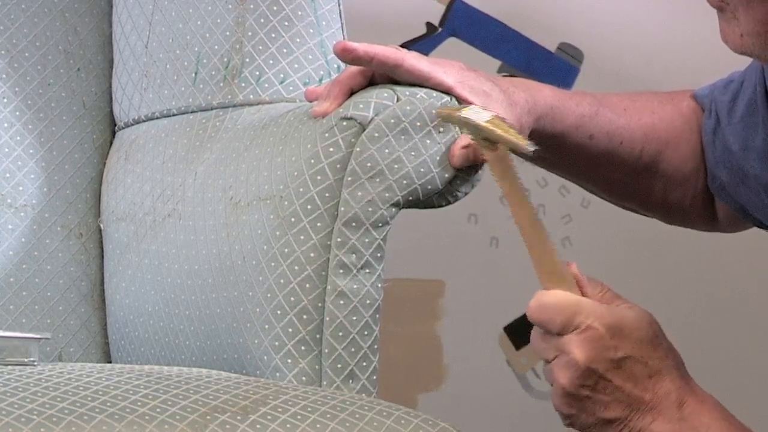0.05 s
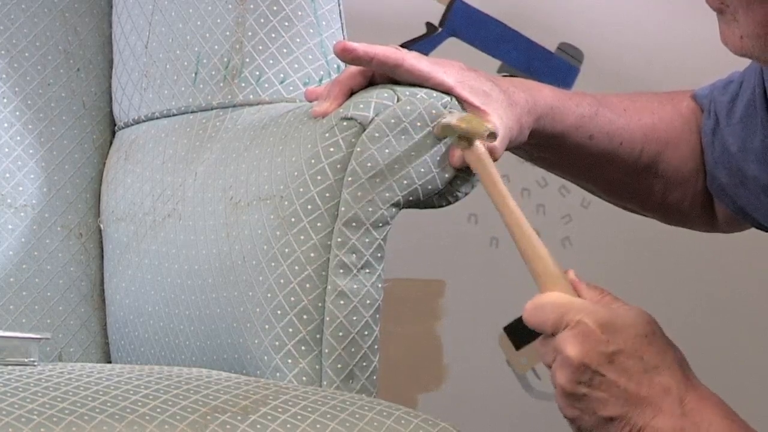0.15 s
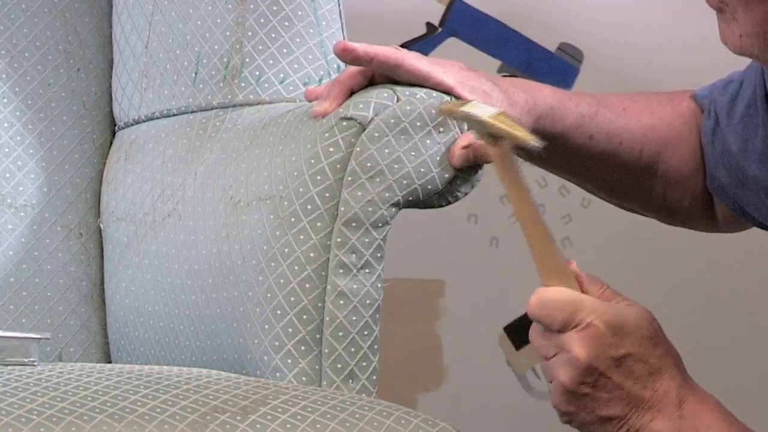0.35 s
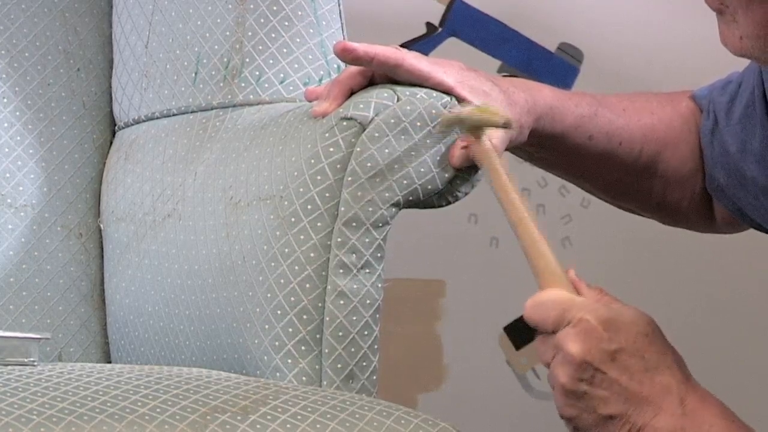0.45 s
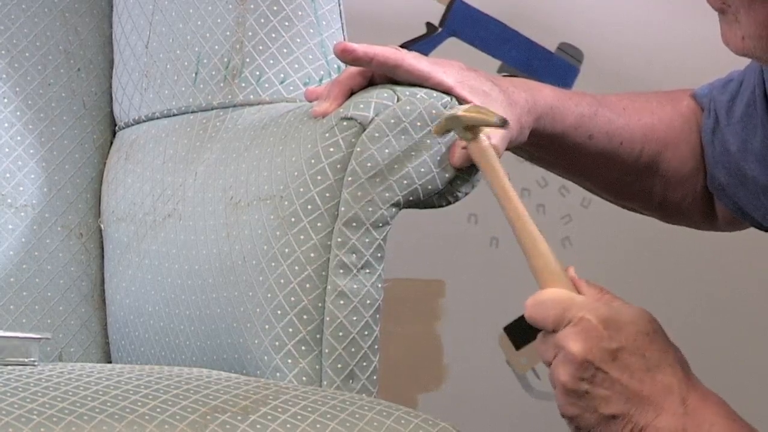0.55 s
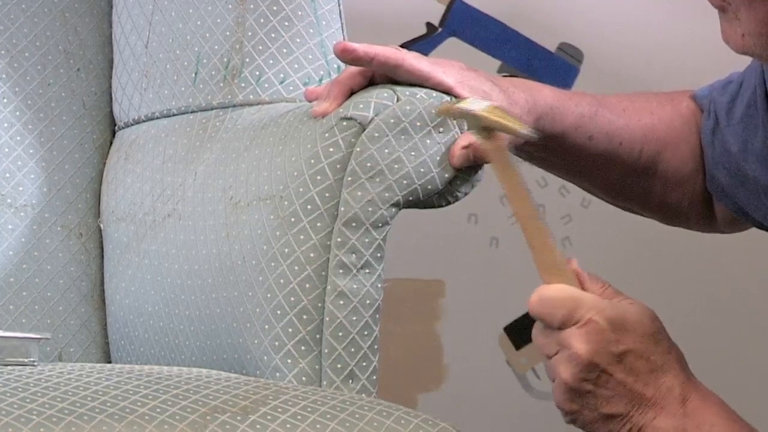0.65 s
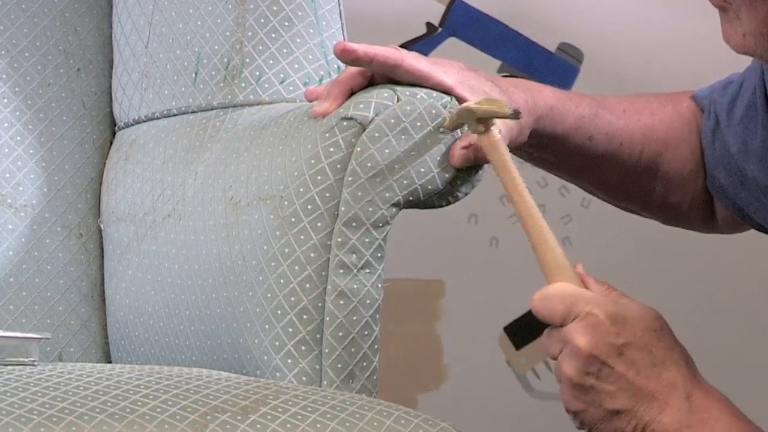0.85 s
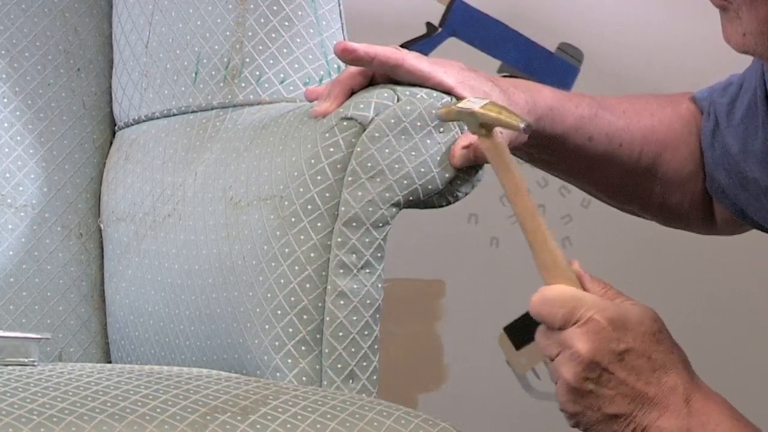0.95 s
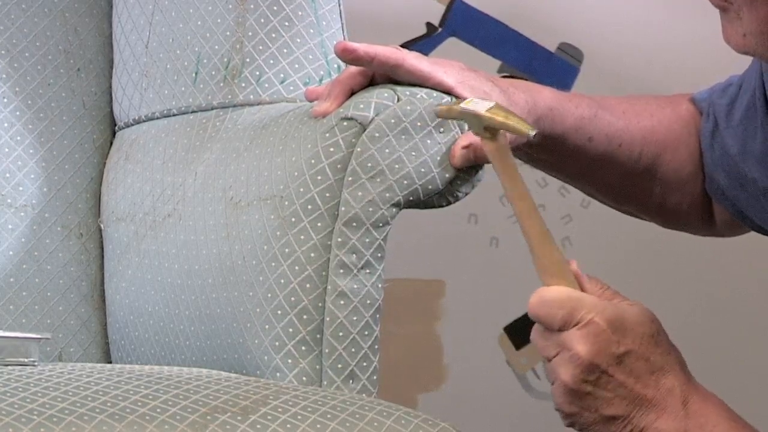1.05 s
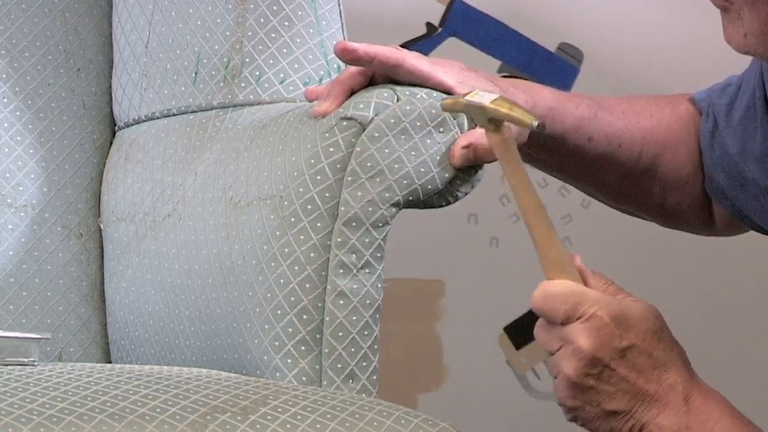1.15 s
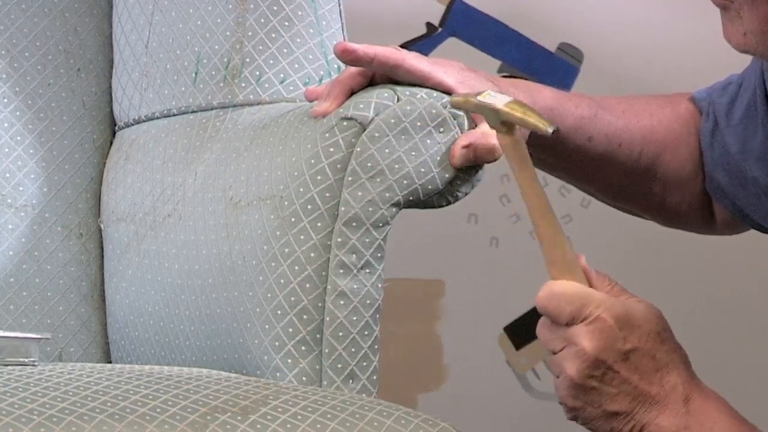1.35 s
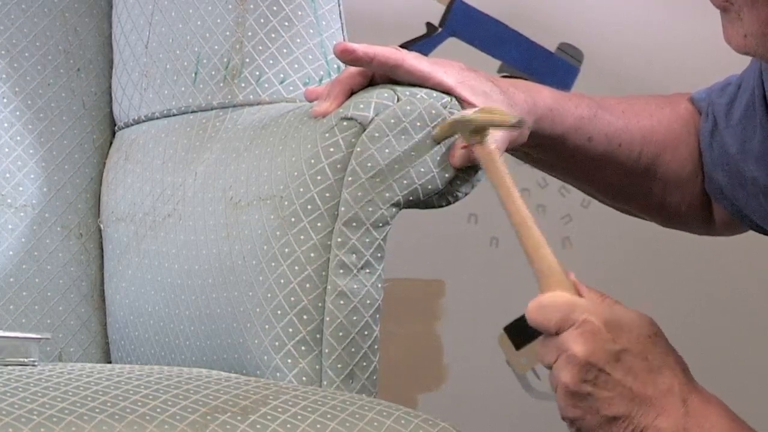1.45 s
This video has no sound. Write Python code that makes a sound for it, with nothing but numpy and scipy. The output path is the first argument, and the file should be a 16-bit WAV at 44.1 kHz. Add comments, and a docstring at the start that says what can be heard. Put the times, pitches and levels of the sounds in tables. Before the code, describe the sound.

Hammering, close up: three evenly spaced woody thuds with a hard crack and brief steel ring

```python
"""Brads hammered into a chair arm

Three quick blows, close to the microphone, drive brads into the padded wooden arm of a chair.
The frame knocks (decaying modes and noise), the steel head rings (wavering modes), the input overloads.
Each blow returns faintly half a second later, as do two struck just before the start.
Near the end a fingertip brushes the fabric (dense grains), over room hum and hiss (sines, banded noise)."""
import sys
import numpy as np
from scipy import signal
from scipy.fft import rfft, irfft, next_fast_len
from scipy.io import wavfile

SR = 44100
rng = np.random.default_rng(int(sys.argv[2]) if len(sys.argv) > 2 else 0)


def bounce(signal):
    """Save signal as a 16-bit WAV file at the path given by the first command-line argument."""
    frames = np.transpose(np.atleast_2d(signal))
    limited = np.clip(frames, -1, 1)
    pcm = np.round(limited * 32767).astype(np.int16)
    wavfile.write(sys.argv[1], SR, pcm)


N = 66150   # samples, 1.5 s
LEAD_S = 0.5   # time computed before the start, so that earlier blows can still ring and return

# The hammer blows; the first two fall before the start.
# Each row: start in seconds, strength in dB, then the trim in dB of the head's low ring,
# of its high ring, and of the crack.
HAMMER_BLOWS = [(-.415, -2.5, -9, 3, 6), (-.107, -2, -3, 9, 0), (0.2078, -1.5, -4.5, 3, 0),
                (0.5257, -1.5, -6, 1, -1), (0.8473, -1.5, 4, 1, 0)]


def blows():
    """Wood and steel of every blow; the body's noise is mostly shared, so it answers nearly alike."""
    own_share = 0.24   # part of the noise power that is new in each blow
    lead = int(LEAD_S * SR)
    t = np.arange(SR // 2) / SR
    out = np.zeros((2, lead + N + SR))
    shared = rng.standard_normal((2, SR))
    for start, strength_db, low_db, high_db, crack_db in HAMMER_BLOWS:
        own = rng.standard_normal((2, SR))
        white = np.sqrt(1 - own_share) * shared + np.sqrt(own_share) * own
        wood = crack(white, t, crack_db) + push(t) + frame(t) + knock(white, t)
        steel = head(t, low_db, high_db)
        i = lead + int(start * SR)
        out[:, i:i + len(t)] += from_db(strength_db) * np.array([wood, steel])
    return out[:, :lead + N]


# The dense body of the knock, noise dying band by band.
# Each row: frequency in Hz, relative level in dB per Hz, time to fall 60 dB in seconds.
KNOCK_BODY = [(40, -21, 0.69), (100, -13.5, 0.4), (250, -4, 0.31), (600, -7.5, .22), (1100, -8, 0.11),
              (2000, -14, 0.13), (4000, -35.5, 0.19), (7740, -49.5, 0.3), (15000, -54.5, .07)]
KNOCK_DB, KNOCK_RISE_CYCLES = 17, 3.1


def knock(white, t):
    """Many close modes heard as noise; each band rises over a few cycles, so the lows come later."""
    out = 0
    for k, (low, high) in enumerate(half_octaves()):
        hz = np.sqrt(low * high)
        rise = 1 - np.exp(-t * hz / KNOCK_RISE_CYCLES)
        decay = from_db(at_hz(KNOCK_BODY, hz) - 60 * t / at_hz(KNOCK_BODY, hz, column=2))
        noise = band(white[k % 2], low, high)[-len(t):]
        out = out + rise * decay * noise
    return out * from_db(KNOCK_DB)


# The separate modes of the wooden chair frame.
# Each row: frequency in Hz, level in dB before the blow's strength, time to fall 60 dB in seconds.
FRAME_MODES = [(75.6, -9.5, 0.18), (111.2, -9, 0.19), (154, -12.5, .22), (240.5, -6.5, 0.17),
               (309.4, 4, 0.076), (339, -15.5, 0.29), (465.2, 1.5, 0.081), (549, 1.5, 0.084),
               (619, 0.5, 0.12), (724.6, -6.5, 0.08), (808.3, -3, 0.076), (1000, -6, 0.095),
               (1162, -17, 0.15), (1383, -13.5, 0.1), (1630, -6, 0.096), (2305, -12.5, 0.071)]
MODE_SPREAD_DB, FRAME_RISE_CYCLES = 0.5, 1.05   # mode levels vary from blow to blow


def frame(t):
    """Wooden modes of alternating sign; each swells over a cycle or so."""
    hz, db, t60 = np.transpose(FRAME_MODES)[:, :, None]
    db = db + MODE_SPREAD_DB * rng.standard_normal(hz.shape)
    sign = (-1.) ** np.arange(len(hz))[:, None]
    rise = 1 - np.exp(-t * hz / FRAME_RISE_CYCLES)
    modes = from_db(db - 60 * t / t60) * np.sin(2 * np.pi * hz * t)
    return np.sum(sign * rise * modes, axis=0)


# The modes of the steel hammer head.
# Each row: frequency in Hz, level in dB before the trims and strength of the blow,
# time to fall 60 dB in seconds.
HEAD_MODES = [(3237, -15, .15), (3388, -13, 0.051), (4540, -40.5, .12), (6160, -26.5, 0.2),
              (5870, -14, 0.047), (10570, -28.5, 0.11), (13120, -35, 0.12)]
HEAD_SPLIT_HZ = 8000   # low ring below, high ring above
CLANK_DB, CLANK_S = 7.5, 0.012   # the head rings louder while it presses on the brad
# the ring starts firm, then wavers in the moving hand
WAVER_DEPTH, WAVER_HZ, HEAD_STEADY_S = 0.98, 110, 0.012


def head(t, low_db, high_db):
    """Steel modes, each wavering in strength and phase."""
    hz, db, t60 = np.transpose(HEAD_MODES)[:, :, None]
    trim_db = np.where(hz < HEAD_SPLIT_HZ, low_db, high_db)
    level_db = db + trim_db + CLANK_DB * np.exp(-t / CLANK_S)
    noise = rng.standard_normal((2, len(hz), 2 * len(t)))
    slow = signal.lfilter(*signal.butter(2, WAVER_HZ, fs=SR), noise)[..., len(t):]
    onset = 1 - np.exp(-t / HEAD_STEADY_S)
    along, across = WAVER_DEPTH * onset * rms_one(slow)
    angle = 2 * np.pi * hz * t
    ring = (1 + along) * np.sin(angle) + across * np.cos(angle)
    return np.sum(from_db(level_db - 60 * t / t60) * ring, axis=0)


CRACK_DB, CRACK_T60_S, CRACK_RISE_S = 6, 0.019, 0.0009
CRACK_LOW_HZ, CRACK_HIGH_HZ = 1300, 5560
TICK_DB, TICK_T60_S, TICK_LOW_HZ = -14.5, 0.008, 5000   # steel meets steel
# The head skips on the brad, repeating the crack.
# Each row: delay in seconds, level in dB relative to the first crack.
BRAD_SKIPS = [(.004, -11), (0.012, -4.5), (.018, -17), (0.026, -22.5)]


def crack(white, t, crack_db):
    """A short noise burst and a bright tick at contact, repeated as the head skips on the brad."""
    rise = 1 - np.exp(-t / CRACK_RISE_S)
    burst = white[0, :len(t)] * rise * from_db(CRACK_DB + crack_db - 60 * t / CRACK_T60_S)
    tick = white[1, :len(t)] * from_db(TICK_DB + crack_db - 60 * t / TICK_T60_S)
    first = band(burst, CRACK_LOW_HZ, CRACK_HIGH_HZ) + band(tick, TICK_LOW_HZ, SR / 2)
    return first + sum(from_db(db) * delayed(first, after) for after, db in BRAD_SKIPS)


def push(t):
    """The padding is shoved in: one slow negative pulse."""
    peak_db, peak_s = -14, 0.0081
    return -from_db(peak_db) * t / peak_s * np.exp(1 - t / peak_s)


LATE_S, LATE_SMEAR_S = 0.509, 0.025
LATE_DB, LATE_WOOD_DB = -37, -4.5   # whole return; its wood against its steel
LATE_LOW_HZ, LATE_HIGH_HZ = 1300, 4060


def workshop(wood, steel):
    """Each blow direct, plus one thin, dull return, smeared by a short noise tail, much later."""
    t = np.arange(SR // 10) / SR
    smear = rng.standard_normal(len(t)) * np.exp(-(t / LATE_SMEAR_S) ** 2)
    smear = smear / np.sqrt(np.sum(smear ** 2))
    thin = band(delayed(steel + from_db(LATE_WOOD_DB) * wood, LATE_S), LATE_LOW_HZ, SR / 2)
    dull = signal.lfilter(*signal.butter(2, LATE_HIGH_HZ, fs=SR), thin)
    late = signal.fftconvolve(dull, smear)[:len(wood)]
    return (wood + steel + from_db(LATE_DB) * late)[-N:]   # the lead is dropped


# The fingertip on the fabric.
# Each row: start, peak and end in seconds, level at the peak in dB rms.
FABRIC_BRUSH = [(1.38, 1.41, 1.432, -39)]
GRAINS_PER_S, GRAIN_SPREAD_DB = 2700, 3.0
BRUSH_LOW_HZ, BRUSH_HIGH_HZ = 990, 2250


def brush():
    """Threads slip one by one under the fingertip: dense uneven grains swell and fade."""
    t = np.arange(N) / SR
    size = from_db(GRAIN_SPREAD_DB * rng.exponential(1, N))
    grains = (rng.random(N) < GRAINS_PER_S / SR) * size * rng.choice([-1, 1], N)
    colour = signal.butter(1, [BRUSH_LOW_HZ, BRUSH_HIGH_HZ], "band", fs=SR)
    soften = signal.butter(2, 3 * BRUSH_HIGH_HZ, fs=SR)
    rustle = rms_one(signal.lfilter(*soften, signal.lfilter(*colour, grains)))
    stroke = 0
    for start, peak, end, db in FABRIC_BRUSH:
        stroke = stroke + from_db(db) * np.interp(t, [start, peak, end], [0, 1, 0])
    return stroke * rustle


# The colour of the room noise. Each row: frequency in Hz, relative level in dB per Hz.
ROOM_COLOUR = [(25, -12.5), (60, -5), (110, -9.5), (190, 1.5), (250, -1), (330, -10.5), (470, -8),
               (640, -13.5), (800, -22.5), (1500, -25), (3000, -31), (6000, -30), (9000, -41),
               (16000, -36.5)]
# How alike left and right hear the room. Each row: frequency in Hz, correlation from 0 to 1.
ROOM_LIKENESS = [(60, 1.0), (240, 1.0), (950, 1.0), (3770, 1), (15000, 0.15)]
# The hum. Each row: frequency in Hz, level in dB rms.
ROOM_HUM = [(120, -47.5), (247, -65.5)]
ROOM_DB = -42.5   # rms of the noise without hum
ROOM_PATCHY_DB, ROOM_FLICKER_HZ = 2.5, 8


def room_tone():
    """Stereo noise in flickering bands, with steady hum."""
    noise, white = 0, rng.standard_normal((2, 2, N + SR // 4))
    for k, (low, high) in enumerate(half_octaves()):
        mid, side = band(white[k % 2], low, high)[:, -N:]
        hz = np.sqrt(low * high)
        alike = np.clip(at_hz(ROOM_LIKENESS, hz), 0, 1)
        gain = from_db(at_hz(ROOM_COLOUR, hz) + ROOM_PATCHY_DB * drift(ROOM_FLICKER_HZ))
        stereo = np.sqrt(1 + alike) * mid + np.sqrt(1 - alike) * side * [[1], [-1]]
        noise = noise + gain * stereo
    t = np.arange(N) / SR
    hum = sum(np.sqrt(2) * from_db(db) * np.sin(2 * np.pi * hz * t) for hz, db in ROOM_HUM)
    return from_db(ROOM_DB) * rms_one(noise) + hum


def from_db(db):
    """Gain of a level."""
    return 10 ** (np.asarray(db) / 20)


def rms_one(x):
    """Scaled to rms 1."""
    return x / np.sqrt(np.mean(x ** 2) + 1e-20)


def at_hz(points, hz, column=1):
    """A table read on a log frequency axis."""
    points = np.array(points)
    return np.interp(np.log(hz), np.log(points[:, 0]), points[:, column])


def band(x, low_hz, high_hz):
    """Second-order band-pass."""
    edges = [low_hz, min(high_hz, .45 * SR)]
    return signal.sosfilt(signal.butter(2, edges, "band", fs=SR, output="sos"), x)


def half_octaves():
    """Band edges from bass to treble."""
    edges = 25 * 2 ** np.arange(0, 9.6, .5)
    return list(zip(edges, edges[1:]))


def drift(rate_hz):
    """Slow random wander of rms 1: noise through two equal poles, drawn every 40 samples."""
    step = 40
    r = np.exp(-2 * np.pi * rate_hz * step / SR)
    noise = rng.standard_normal(N // step + 2002)
    slow = signal.lfilter([1], [1, -2 * r, r * r], noise)[2000:]   # settled part
    return np.interp(np.arange(N) / step, np.arange(len(slow)), rms_one(slow))


def delayed(x, s):
    """Later by s seconds."""
    return np.concatenate([np.zeros(int(s * SR)), x])[:len(x)]


def scene():
    """Chair and room, both in front of the microphone."""
    return workshop(*blows()) + brush() + room_tone()


LEFT_LAG_SAMPLES, MIC_LOW_HZ, CUTOFF_HZ = 0.9, 37, 17000
KNEE = 28   # the higher, the harder the overload at full scale


def record(dry):
    """The left capsule hears a hair later; deep bass is thinned, peaks overload flat, the top is cut."""
    size = next_fast_len(N + 64)
    lag = np.array([[LEFT_LAG_SAMPLES], [0]])
    turn = np.exp(-2j * np.pi * np.arange(size // 2 + 1) / size * lag)   # delay as a phase turn
    x = irfft(rfft(dry, size) * turn, size)[:, :N]
    x = signal.lfilter(*signal.butter(1, MIC_LOW_HZ, "high", fs=SR), x)
    x = x / (1 + np.abs(x) ** KNEE) ** (1 / KNEE)
    top_cut = signal.cheby2(12, 70, CUTOFF_HZ, fs=SR, output="sos")
    return np.clip(signal.sosfilt(top_cut, x), -1, 1)


dry = scene()
out = record(dry)
bounce(out)
```